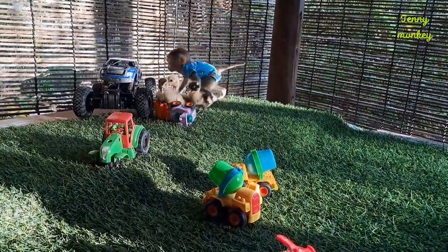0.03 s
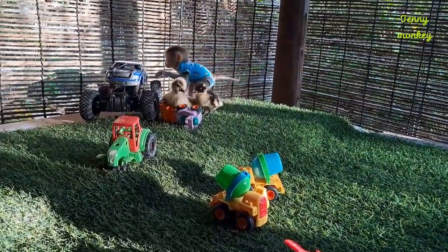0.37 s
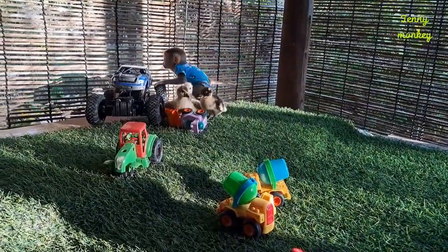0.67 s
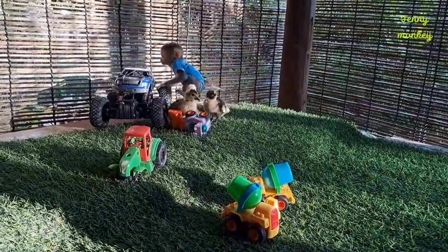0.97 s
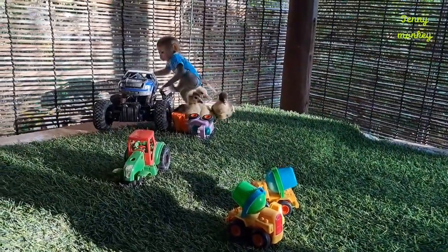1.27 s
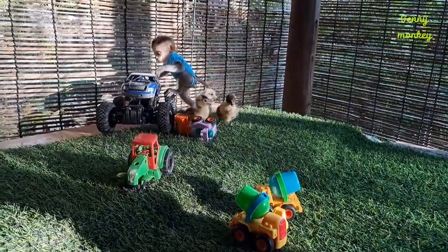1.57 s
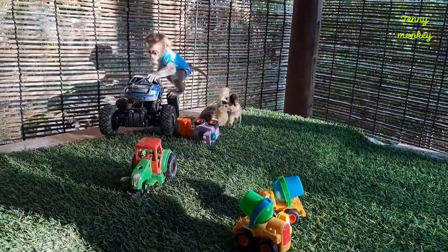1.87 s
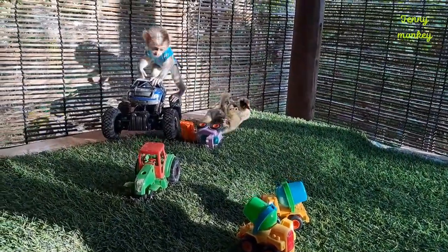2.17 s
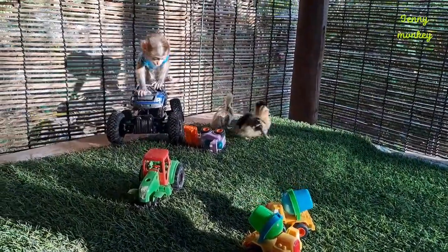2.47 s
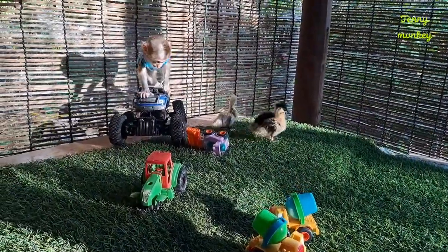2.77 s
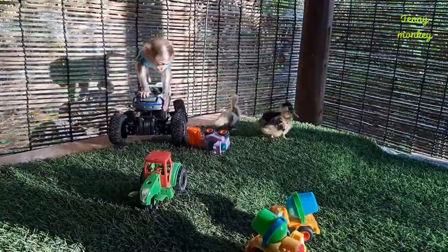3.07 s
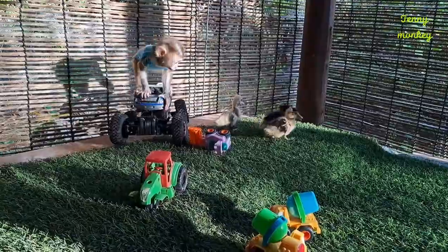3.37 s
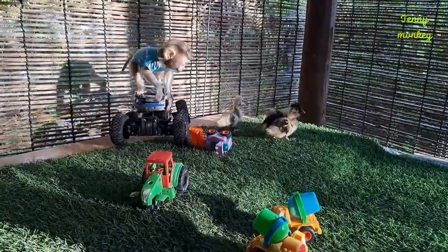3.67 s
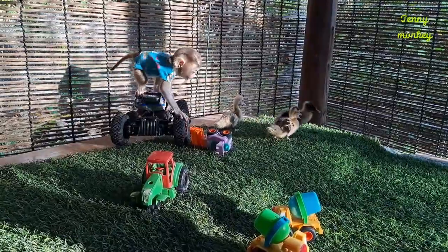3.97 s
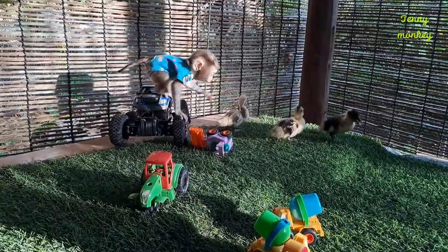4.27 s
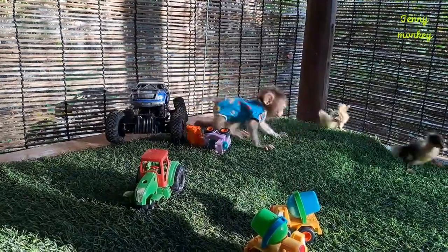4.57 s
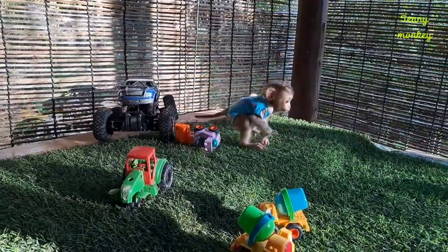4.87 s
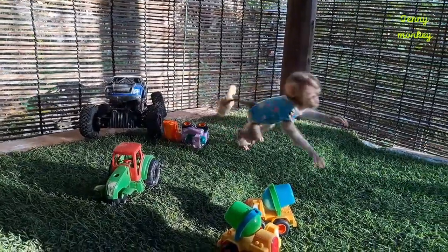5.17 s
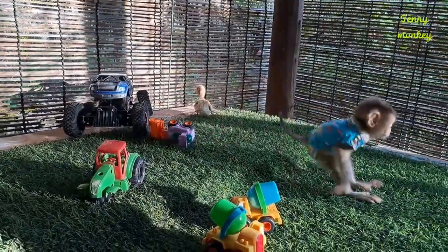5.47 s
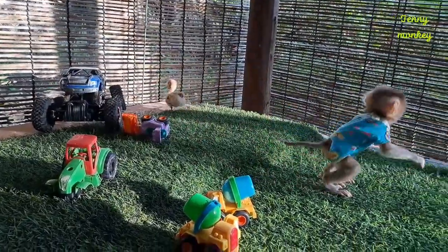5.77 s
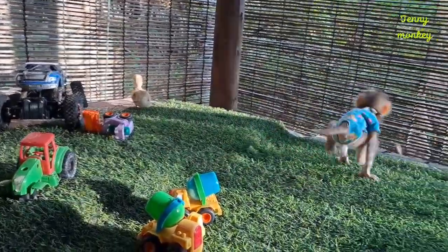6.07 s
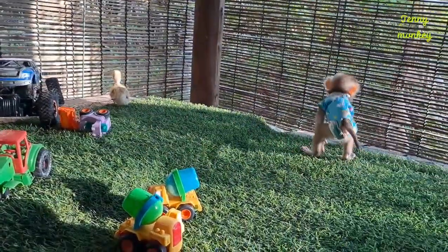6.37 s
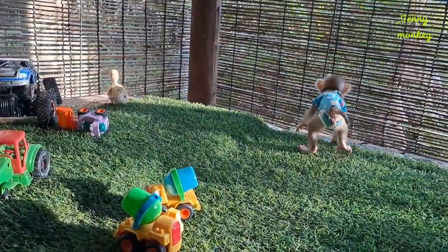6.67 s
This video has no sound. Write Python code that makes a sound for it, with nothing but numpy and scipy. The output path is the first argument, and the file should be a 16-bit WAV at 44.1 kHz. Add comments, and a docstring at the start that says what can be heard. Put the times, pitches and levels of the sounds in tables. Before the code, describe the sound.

Ducklings give short, high peeps outdoors, sparse at first, then in a louder, quicker run around the middle before thinning out. A small monkey climbing on hollow plastic toys makes a few light knocks, then soft scuffs as it hops across artificial turf. The peeps sound fairly near, with a slight short echo. A distant engine idles under a throbbing low rumble, with faint insects throughout.

```python
"""In an outdoor pen of reed screens, ducklings peep while a small monkey clambers over plastic toys
and hops off across turf. Each peep is an arched whistle from the syrinx that plunges as the membrane
slackens and rings briefly between the screens. Knocks excite the hollow toys; feet flick plastic blades.
Far off, an engine idles under a throbbing rumble and a wash of air, with one faint toot; insects shrill."""
import sys
import numpy as np
from scipy import signal
from scipy.fft import rfft, irfft, next_fast_len
from scipy.io import wavfile
from scipy.ndimage import uniform_filter1d

SR = 44100
rng = np.random.default_rng(int(sys.argv[2]) if len(sys.argv) > 2 else 0)


def generate_wav(sig):
    """Save sig (samples, or channels by samples) to the path in sys.argv[1] as 16-bit PCM at SR."""
    pcm = np.round(np.clip(np.atleast_2d(sig).T, -1, 1) * 32767).astype(np.int16)
    wavfile.write(sys.argv[1], SR, pcm)


N = 305172
TIME = np.arange(N) / SR

# Left-right coherence of distant sound: frequency_hz, correlation
COHERENCE = [(60, 1), (125, 0.94), (250, 1), (500, 0.5), (1000, 0.42), (3000, 0.09)]


def undb(db):
    """Amplitude ratio of a level in decibels."""
    return 10 ** (np.asarray(db) / 20)


def unit(x):
    """Normalisation to an rms of 1."""
    return x / np.sqrt(np.mean(x ** 2))


def on_log_axis(points, size):
    """Interpolation of (frequency_hz, value) points onto FFT bins, in log frequency."""
    hz, value = np.transpose(points)
    return np.interp(np.log(np.fft.rfftfreq(size, 1 / SR) + 1), np.log(hz), value)


def noise(spectrum, coherence=None, size=N):
    """Spectrally shaped stereo noise; the balance of mid and side sets the left-right correlation."""
    padded = next_fast_len(size, real=True)
    alike = 0 if coherence is None else np.clip(on_log_axis(coherence, padded), -1, 1)
    in_band = np.fft.rfftfreq(padded, 1 / SR) < spectrum[-1][0]
    mid, side = rfft(rng.standard_normal((2, padded))) * undb(on_log_axis(spectrum, padded)) * in_band
    mid, side = mid * np.sqrt(1 + alike), side * np.sqrt(1 - alike)
    return unit(irfft([mid + side, mid - side], padded)[:, :size])


def walk(rate_hz, size=N):
    """Smooth random modulation with an rms near 1."""
    step = max(int(SR / rate_hz), 2)
    held = np.repeat(rng.standard_normal(size // step + 1), step)
    return unit(uniform_filter1d(uniform_filter1d(held, step), step))[:size]


def add(out, start_s, sound):
    """Superposition of a sound onto out."""
    start = max(int(start_s * SR), 0)
    part = sound[..., :N - start]
    out[..., start:start + part.shape[-1]] += part


def peep(length_s, crest_hz, sag_hz_per_s, effort, overtone_db):
    """Source and filter: pitch follows tension as the syrinx tightens, sags, then slackens at once."""
    # Response of throat and bill: frequency_hz, gain_db
    bill = [(2100, -16), (2900, -2), (3700, -0.5), (4500, 2), (5600, 2.5), (7200, -2.5), (8300, -10),
            (9600, -12), (11500, -3.5), (14000, -18), (15800, -10.5)]
    rise_s, plunge_s, catch_s = .02, .034, .005
    t = TIME[:int(length_s * SR)]
    size = len(t)
    below_crest = np.clip(1 - t / rise_s, 0, 1)
    held_s = np.maximum(t - rise_s, 0)
    drop = np.clip(1 - (length_s - t) / plunge_s, 0, 1)
    plunge_hz = 1208 * effort ** .37 * drop ** 1.6
    hz = crest_hz * (1 - .15 * below_crest ** 2) - sag_hz_per_s * held_s - plunge_hz
    jitter = 1 + .008 * walk(300, size) + .0099 * walk(2500, size)
    phase = 2 * np.pi * np.cumsum(hz * jitter) / SR
    whistle, *overtones = (undb(np.interp(k * hz, *np.transpose(bill))) * np.sin(k * phase)
                           for k in range(1, 5))
    # a thin lead-in, then the voice catches at full pressure and slowly gives out
    lead_s = np.interp(effort, [0, 1], [.028, .015])
    leading = .5 - .5 * np.tanh((t - lead_s) / catch_s)
    flutter_db = 2.5 * walk(196.6, size)
    pressure = undb(-18 * leading - 4.5 * held_s / held_s[-1] - 3 * drop + flutter_db)
    # the slackening membrane buzzes more, so the overtones stand out in the plunge
    buzz = undb(overtone_db + .0074 * (crest_hz - hz) * (held_s > 0)) * sum(overtones)
    # high pressure turns the voice rough: hiss, and lines halfway between the harmonics
    half_harmonics = sum(np.sin((k + .5) * phase) / k for k in range(1, 4))
    hiss = noise(bill, size=size)[0]
    rasp = pressure * undb(overtone_db - 9.5) * effort ** .28 * (hiss + undb(-3) * half_harmonics)
    return np.sqrt(2) * pressure * (whistle + buzz + rasp) * signal.windows.tukey(size, .1)


def ducklings(full_effort_db=-25, left_lag_s=.00005, echo_db=-3):
    """Direct and reflected peeps; a difference in arrival time sets them a little right of centre."""
    # Calls: start_s, length_s, crest_hz, sag_hz_per_s, level_db, overtone_db
    peeps = [ (0.138, 0.087, 3920, 7500, -29, -18), (1.412, 0.052, 3290, 3040, -44.5, -22),
             (1.575, 0.05, 3550, 3500, -42.5, -16), (1.828, 0.06, 3546, 5040, -33, -20.5),
             (3.049, 0.064, 3622, 5000, -32, -23), (3.328, 0.093, 3565, 2500, -29.5, -23.5),
             (3.521, 0.068, 3560, 4000, -32, -23), (3.544, .084, 3916, 10000, -27, -28.5),
             (3.774, 0.085, 3910, 6060, -23, -27.5), (3.992, 0.1, 3857, 5600, -25, -25.5),
             (4.238, 0.11, 3842, 6020, -25.5, -24), (4.476, 0.096, 3487, 1863, -32, -19),
             (4.536, .082, 4300, 5120, -28, -15.5), (5.293, 0.074, 3633, 5060, -43, -7.5),
             (5.453, .066, 3785, 6200, -35.5, -15.5), (6.006, 0.076, 3875, 13880, -36.5, -17),
             (6.026, 0.084, 3157, 7000, -38, -17.5), (6.724, 0.087, 3813, 10870, -41.5, -22.5)]
    calls = np.zeros(N)
    for start_s, length_s, crest_hz, sag_hz_per_s, level_db, overtone_db in peeps:
        effort = undb(level_db - full_effort_db)
        add(calls, start_s, undb(level_db) * peep(length_s, crest_hz, sag_hz_per_s, effort, overtone_db))
    direct = np.array([np.roll(calls, int(left_lag_s * SR)), calls])
    return direct + undb(echo_db) * pen(calls)


def pen(sound, build_s=.0059):
    """Reverberation: convolution with early reflections and exponentially decaying diffuse scatter."""
    # Scatter from the near reeds and the yard beyond: t60_s, level_db
    scatter = [(0.191, 5.5), (.42, -8.5)]
    # Reflections off ground and screens: left_delay_s, right_delay_s, gain_db
    reflections = [(.0021, 0.0013, -6), (.0068, 0.0075, -2.5), (0.015, .0127, -6), (0.0183, 0.018, -7),
                   (0.0271, .0288, -22)]
    t = TIME[:SR // 2]
    response = np.zeros((2, len(t)))
    for t60_s, level_db in scatter:
        envelope = np.exp(-np.log(1000) * t / t60_s) * (1 - np.exp(-t / build_s))
        tail = unit(rng.standard_normal(response.shape) * envelope)
        response += tail * undb(level_db) / np.sqrt(len(t))
    for left_delay_s, right_delay_s, gain_db in reflections:
        add(response[0], left_delay_s, undb([gain_db]))
        add(response[1], right_delay_s, undb([gain_db]))
    return signal.fftconvolve(sound[None], response, axes=1)[:, :N]


def toys(crack_decay_s=.0031, echo_db=3):
    """Modal resonance: a short crack of impact rings the hollow plastic body."""
    # Impacts on the toys: start_s, peak_db, tilt_db_per_octave
    knocks = [(2.141, -61, -1), (2.242, -48, 5), (2.3825, -33, 3), (4.421, -37.5, -14)]
    # Modes of the body: frequency_hz, bandwidth_hz, gain_db
    modes = [(1600, 1600, 14), (2950, 1200, 2), (4740, 1100, -3), (6460, 400, 4), (12500, 4400, -9)]
    out, t = np.zeros(N), TIME[:SR // 10]
    for start_s, peak_db, tilt in knocks:
        crack = rng.standard_normal(len(t)) * np.exp(-t / crack_decay_s)
        ring = np.zeros(len(t))
        for hz, bandwidth_hz, gain_db in modes:
            resonator = signal.iirpeak(hz, hz / bandwidth_hz, SR)
            ring += undb(gain_db + tilt * np.log2(hz)) * signal.lfilter(*resonator, crack)
        add(out, start_s, undb(peak_db) * ring / np.abs(ring).max())
    return out + undb(echo_db) * pen(out)


def turf(grain_db=2):
    """Friction noise: plastic blades flick past a landing foot in a dense, fading crackle."""
    # Footfalls: start_s, length_s, level_db
    scuffs = [(0.447, 0.18, -63), (0.887, 0.088, -59), (4.471, 0.23, -48), (4.999, 0.12, -50.5),
              (5.333, 0.15, -53), (6.423, 0.097, -55.5)]
    # Spectrum of the blades: frequency_hz, level_db
    blade_spectrum = [(900, 1), (2000, 5), (4000, 1), (7000, 2), (12000, -6), (16000, -2)]
    out = np.zeros((2, N))
    for start_s, length_s, level_db in scuffs:
        size = int(length_s * SR)
        blades = unit(noise(blade_spectrum, size=size) * undb(grain_db * walk(980, size)))
        envelope = np.sin(np.pi * np.sqrt(np.linspace(0, 1, size)))
        add(out, start_s, undb(level_db) * blades * envelope)
    return out


def engine(firing_hz=38.53, slowing_hz_per_s=.1, gain_db=-40, waver_db=2):
    """Periodic firing makes a harmonic series; only low orders carry this far, wavering on the way."""
    # Harmonics of the firing rate: order, level_db
    orders = [(1, -13), (2, 2.5), (3, 0.5), (4, -14), (5, -14), (6, -18.5), (7, -26.5), (8, -28)]
    hz = (firing_hz - slowing_hz_per_s * TIME) * (1 + .0035 * walk(8))
    phase = 2 * np.pi * np.cumsum(hz) / SR
    hum = sum(undb(level_db + waver_db * walk(5)) * np.sin(order * phase + 2 * np.pi * rng.random())
              for order, level_db in orders)
    swell_db = 3.5 * np.exp(-((TIME - 3.28) / 3) ** 2)
    return np.sqrt(2) * hum * undb(gain_db + swell_db)


def rumble(level_db=-33, fade_db_per_s=-.28, throb_hz=2.82, surge_hz=59.75, surge_s=.2):
    """Amplitude modulation makes a deep noise band throb; brief low tones add surges."""
    # Spectrum of the drone: frequency_hz, level_db
    drone_spectrum = [(25, -35), (42, -15), (54, 12.5), (68, 11.5), (82, 8), (100, -8), (160, -58.5)]
    # Deep surges: centre_s, level_db
    surges = [(0.499, -27), (0.938, -28), (1.16, -28), (1.81, -24.5), (3.37, -24), (4.05, -30.5),
              (5.15, -30.5), (5.368, -25.5), (5.78, -32), (6.499, -29.5)]
    drone = noise(drone_spectrum, COHERENCE)
    steady = drone / np.sqrt(uniform_filter1d(np.mean(drone ** 2, axis=0), SR // 10))
    throb_db = 3.5 * np.cos(2 * np.pi * throb_hz * (TIME - .13))
    flicker_db = 2.5 * walk(41)
    out = steady * undb(level_db + fade_db_per_s * TIME + throb_db + flicker_db)
    size = int(surge_s * SR)
    for centre_s, surge_db in surges:
        cycles = rng.random() + np.cumsum(surge_hz * (1 + .057 * walk(30, size))) / SR
        surge = np.sqrt(2) * np.sin(2 * np.pi * cycles) * np.hanning(size)
        add(out, centre_s - surge_s / 2, undb(surge_db) * surge)
    return out


def air(wash_db=-39, midrange_db=-64, left_bias_db=2.5):
    """Ambient noise, coherent in the bass and diffuse in the treble, eases towards the end."""
    # Spectrum of the outdoor wash: frequency_hz, level_db
    wash_spectrum = [(25, -38), (80, 1.5), (140, -1), (200, -11.5), (280, -18.5), (400, -19.5),
                     (700, -20.5), (1200, -23), (1700, -29), (2500, -39), (4500, -48), (8000, -43.5),
                     (16000, -75.5)]
    # Middle band that swells and sinks on its own: frequency_hz, level_db
    midrange_spectrum = [(250, -30.5), (550, 2.5), (1200, -10), (2200, -11.5)]
    wash = noise(wash_spectrum, COHERENCE) * undb(wash_db + .5 * walk(4.16))
    midrange = noise(midrange_spectrum, COHERENCE) * undb(midrange_db + 3 * walk(12))
    fade_db = np.interp(TIME, [4.6, 6.0], [0, -2.5])
    return (wash + midrange) * undb(fade_db + np.array([[left_bias_db], [-left_bias_db]]) / 2)


def insects(phrase_s=.641, stroke_hz=149.5, chirp_hz=10.8, right_bias_db=1):
    """Stridulation as modulated noise: one insect buzzes in phrases over a chorus; a cricket pulses."""
    # Band of the shrilling insect: frequency_hz, level_db
    shrill_spectrum = [(10000, -41), (10650, -5.5), (11000, -5), (11350, -6.5), (12000, -36)]
    # Band of the steady chorus: frequency_hz, level_db
    chorus_spectrum = [(6000, -42), (8000, -15), (9200, 0), (10100, -8.5), (11200, -3), (12300, -7),
                       (13300, -21.5), (15800, -20)]
    # Resonance of the cricket's wing: frequency_hz, level_db
    wing_spectrum = [(6500, -47.5), (7200, 2.5), (7900, -31)]
    # Envelope of the cricket: time_s, level_db
    cricket_levels = [(0, -65), (1.8, -68.5), (2.3, -83.5), (6.9, -82)]
    pauses = sum(np.exp(-((TIME - s) / .055) ** 4) for s in np.arange(.755, TIME[-1], phrase_s))
    stroke_phase = 2 * np.pi * np.cumsum(stroke_hz * (1 + .0036 * walk(4.6))) / SR
    shrill = noise(shrill_spectrum) * (1 + .38 * np.sin(stroke_phase)) * undb(-60 - 13 * pauses)
    chorus = noise(chorus_spectrum) * undb(-60 + .71 * walk(30))
    chirps = noise(wing_spectrum) * np.sin(np.pi * chirp_hz * TIME + .5 * walk(1.4)) ** 2
    cricket = chirps * undb(np.interp(TIME, *np.transpose(cricket_levels)))
    return (shrill + chorus + cricket) * undb(np.array([[-right_bias_db], [right_bias_db]]) / 2)


def toot(centre_s=2.3, half_width_s=.043, blur_rad=.78):
    """Random phase modulation broadens the partials of one brief tone, blurred by distance."""
    # Partials of the far-off tone: frequency_hz, level_db
    partials = [(885, -45), (1330, -53), (1770, -55.5)]
    tone = sum(undb(db) * np.sin(2 * np.pi * hz * TIME + blur_rad * walk(90)) for hz, db in partials)
    return np.sqrt(2) * tone * np.exp(-((TIME - centre_s) / half_width_s) ** 2)


def scene(right_lag_s=.00042):
    """Superposition of all sources; the distant ones lie to the left and reach the right side later."""
    left, right = engine() + rumble() + air() + toot()
    distant = np.array([left, np.interp(TIME - right_lag_s, TIME, right)])
    return ducklings() + toys() + turf() + insects() + distant


def record(dry, cutoff_hz=15800):
    """Band limiting: a steep elliptic low-pass removes the highest treble."""
    return signal.sosfilt(signal.ellip(10, .2, 80, cutoff_hz, fs=SR, output="sos"), dry)


dry = scene()
out = record(dry)
generate_wav(out)
```